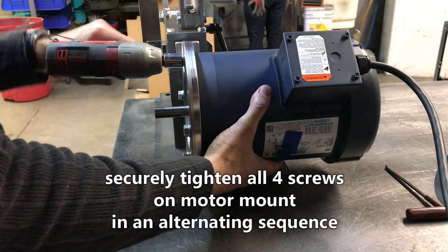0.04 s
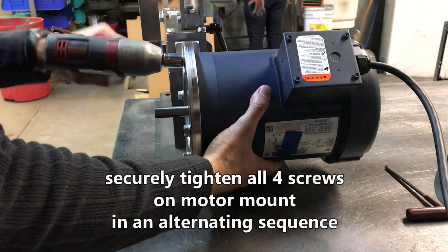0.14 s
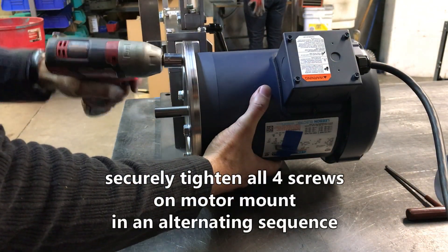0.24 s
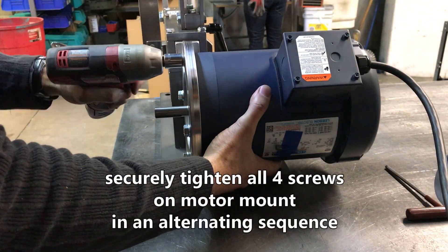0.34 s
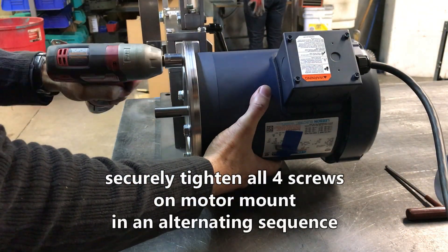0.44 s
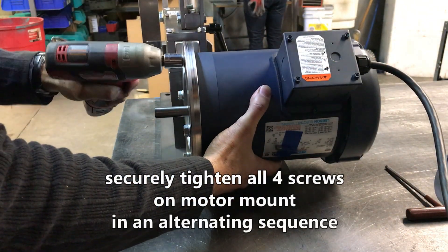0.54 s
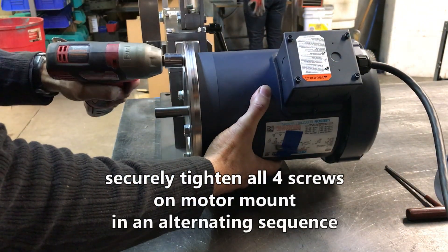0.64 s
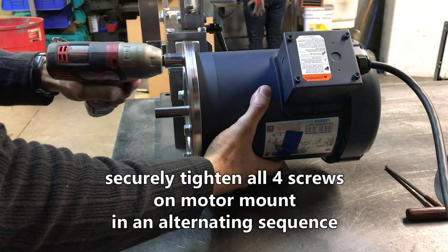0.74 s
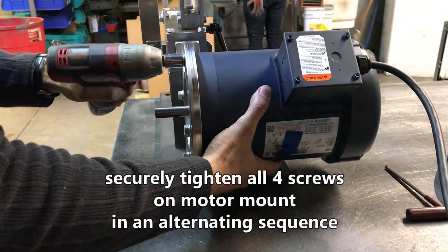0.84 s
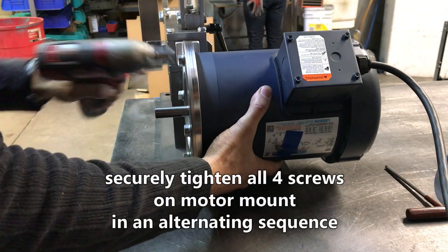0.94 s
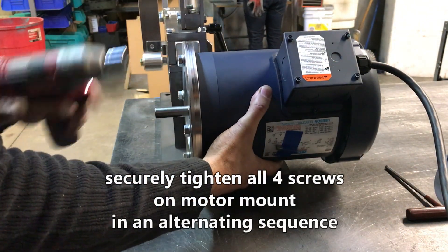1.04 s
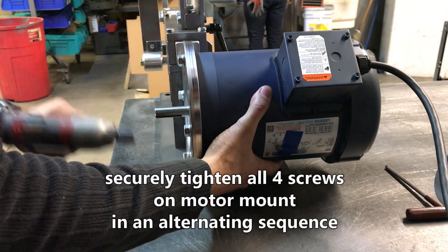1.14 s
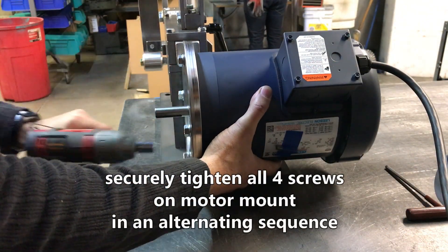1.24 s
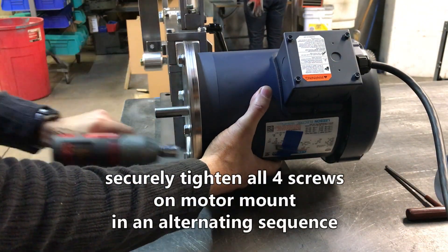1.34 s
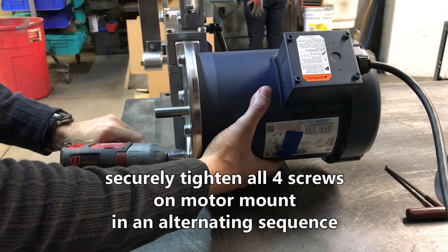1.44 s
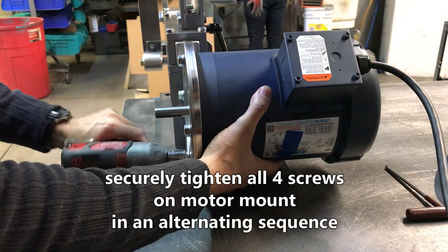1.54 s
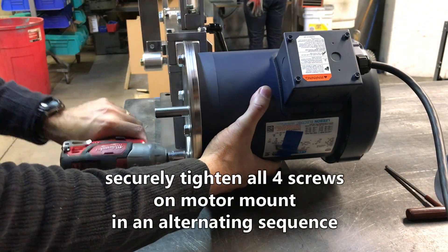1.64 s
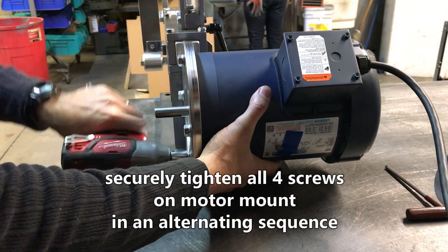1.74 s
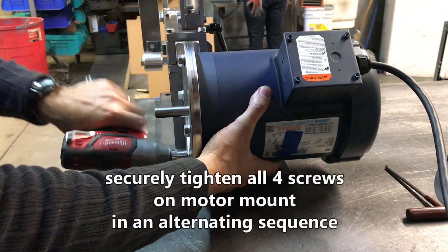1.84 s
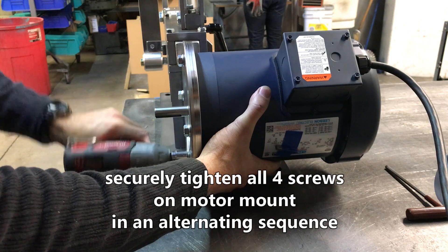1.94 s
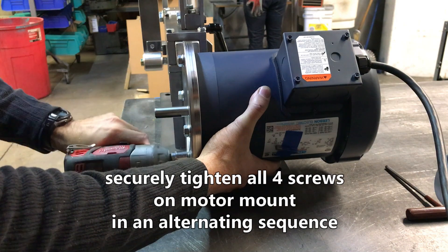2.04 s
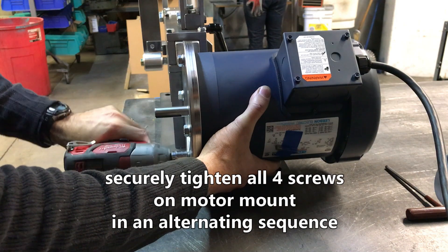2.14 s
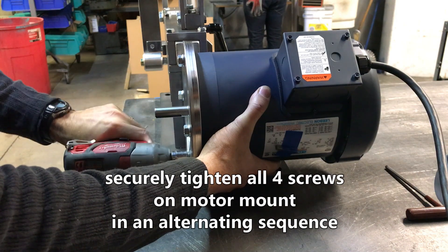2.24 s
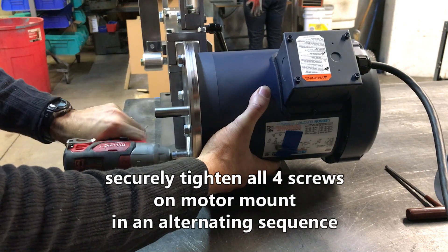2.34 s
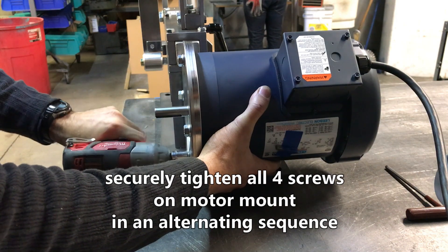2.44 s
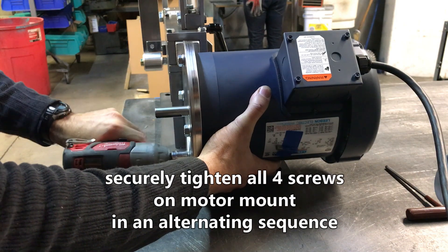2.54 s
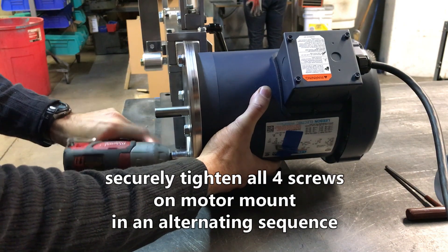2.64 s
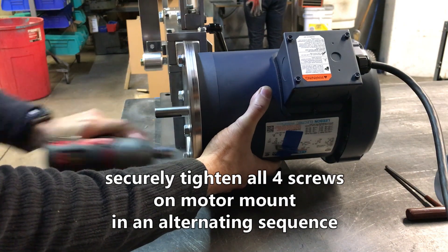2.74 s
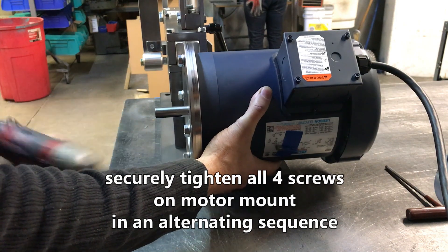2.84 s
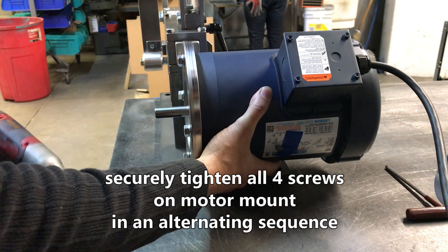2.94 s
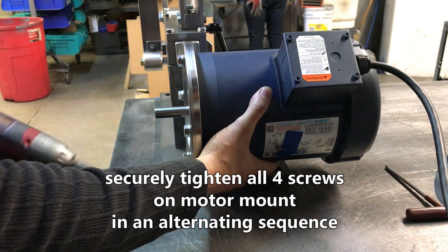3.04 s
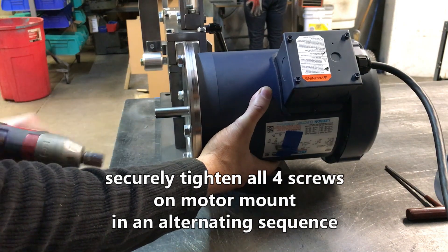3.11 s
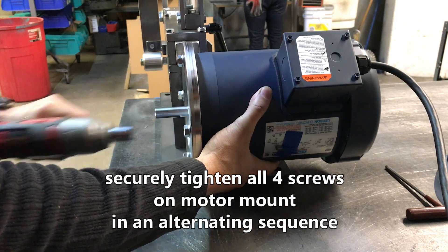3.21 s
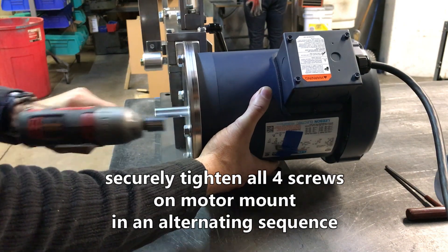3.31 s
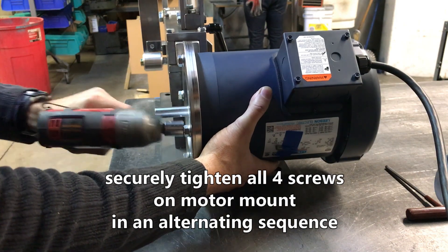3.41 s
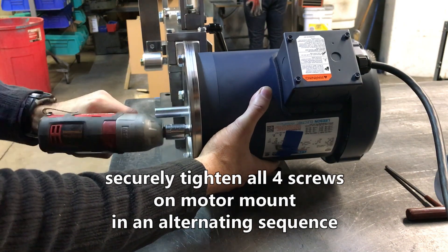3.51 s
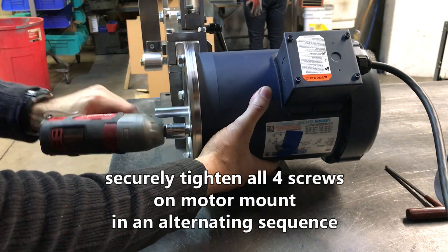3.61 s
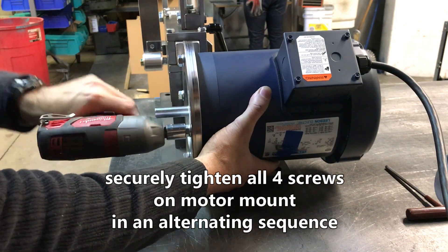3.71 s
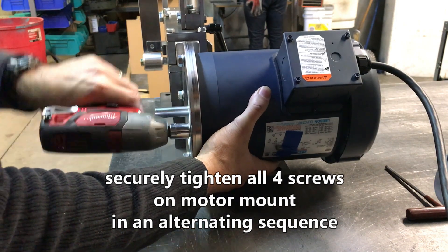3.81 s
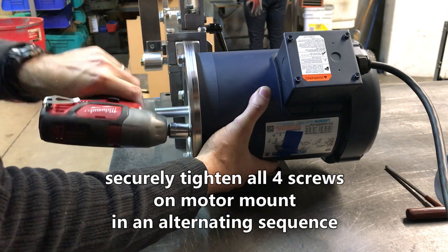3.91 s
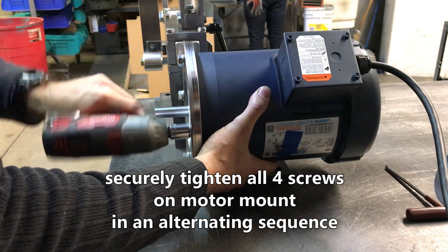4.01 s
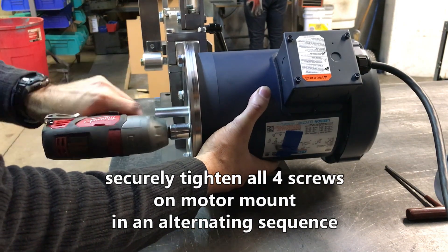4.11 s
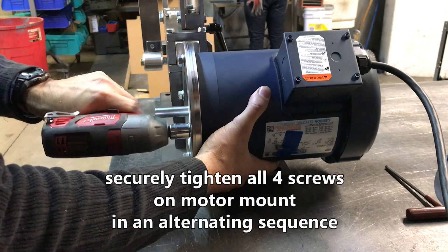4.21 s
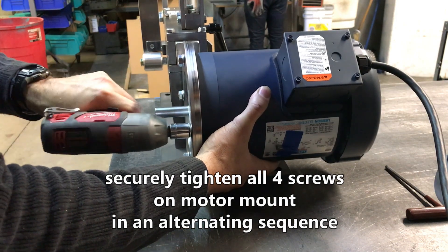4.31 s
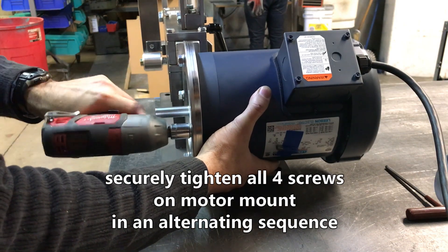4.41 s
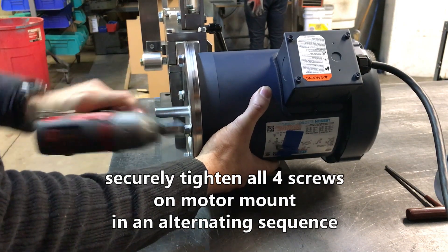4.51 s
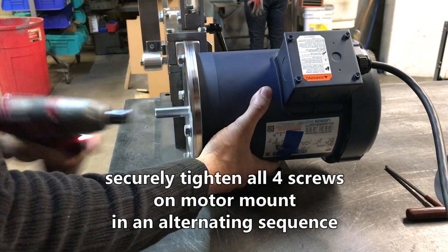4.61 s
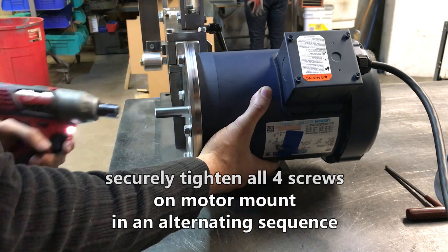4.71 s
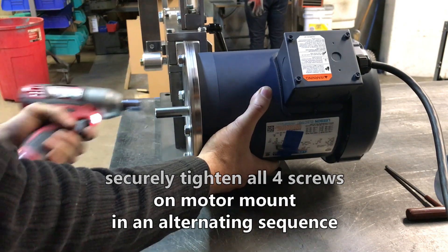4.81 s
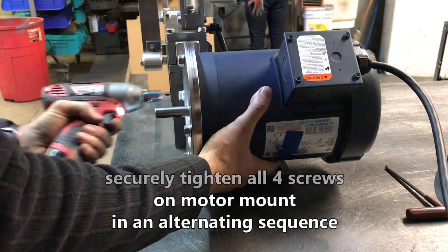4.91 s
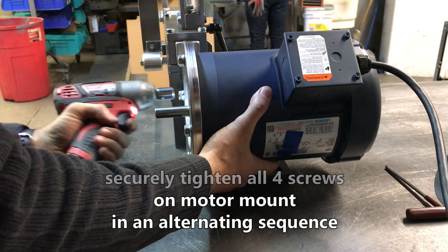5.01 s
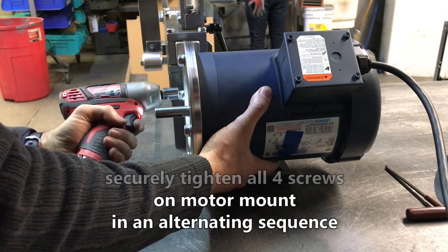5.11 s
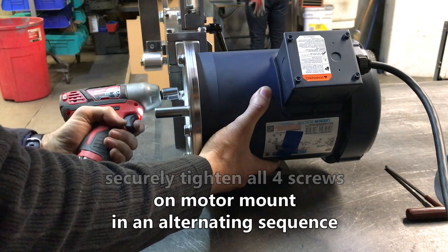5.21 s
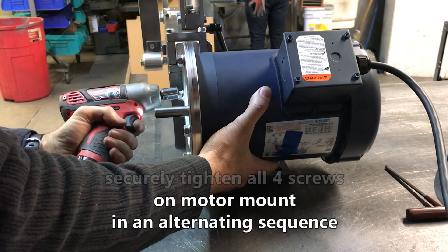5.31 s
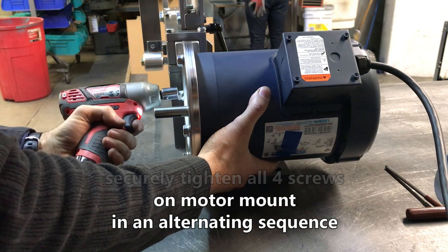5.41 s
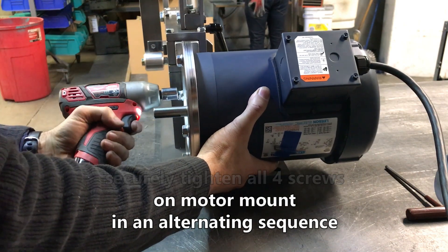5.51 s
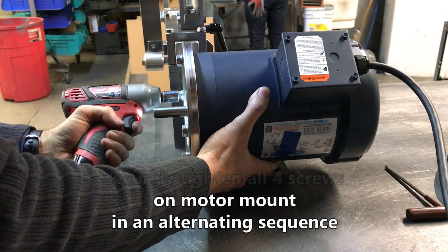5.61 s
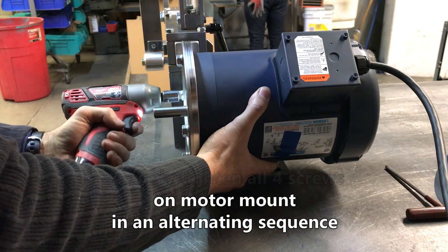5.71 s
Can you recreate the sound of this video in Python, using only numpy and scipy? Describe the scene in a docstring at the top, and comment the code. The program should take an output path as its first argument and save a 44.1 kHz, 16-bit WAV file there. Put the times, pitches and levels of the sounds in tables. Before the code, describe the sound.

A cordless impact driver rattles in three short bursts, with light metal clicks between them, over a throbbing workshop machine.

```python
"""A cordless impact driver tightens three screws on a motor's mounting plate. Each burst is a short
train of hammer blows that ring the steel and grow harder as the screw seats; a few jolt the bench.
Between bursts the bit clicks on the screw heads. Behind, a belt-driven workshop machine throbs,
later joined by a hiss of air. Gain control ducks the workshop under each burst and lets it swell back."""
import sys
import numpy as np
from scipy import signal
from scipy.fft import rfft, irfft, next_fast_len
from scipy.io import wavfile
from scipy.ndimage import uniform_filter1d, map_coordinates

SR = 44100
rng = np.random.default_rng(int(sys.argv[2]) if len(sys.argv) > 2 else 0)


def waveform_to_disk(signal):
    """Save audio, clipped to [-1, 1], as 16-bit WAV at the path in sys.argv[1]."""
    frames = np.transpose(np.atleast_2d(signal))
    scaled = np.clip(frames, -1, 1) * 32767
    samples = np.round(scaled).astype(np.int16)
    wavfile.write(sys.argv[1], SR, samples)


N = 253575

# Machine clatter. Each row: frequency in Hz, relative level in dB.
CLATTER_SPECTRUM = [(25, -21), (70, -13.5), (120, -3.5), (270, -10.5), (420, -5), (620, -6), (1050, -5),
                    (1650, -12.5), (3250, -16), (4700, -26), (6500, -27), (7900, -32), (9800, -32.5),
                    (16000, -47)]
# Machine hum. Each row: frequency in Hz, relative level in dB.
HUM_TONES = [(118.4, -57.5), (360.7, -61), (452.2, -57), (549.1, -54), (592.2, -57.5), (699.8, -52.5),
             (845.2, -59), (969.0, -57.5), (1120, -58), (1238, -60.5), (1324, -59)]
# Belt speed. Each row: time in seconds, turns per second.
BELT_SPEED = [(0, 11.37), (1.2, 11.42), (3.2, 11.33), (4.6, 11.2), (5.75, 11.33)]
# Air hiss. Each row: frequency in Hz, relative level in dB.
HISS_SPECTRUM = [(1000, -14.5), (2400, 1.5), (4000, 0), (5000, -4.5), (6300, -5), (7800, -11.5),
                 (9400, -11), (10500, -19), (13300, -17.5), (16000, -26)]
# Build-up of the hiss. Each row: time in seconds, level in dB.
HISS_ENVELOPE = [(2.5, -75), (2.8, -55), (3.3, -51), (4, -49), (5.75, -50.5)]
# Workshop echo. Each row: frequency in Hz, T60 in seconds.
ROOM_DECAY = [(200, 0.53), (4000, 0.35), (8000, 0.23), (15000, 0.133)]
# Blows that jolt the bench. Each row: start in seconds, level in dB.
BENCH_JOLTS = [(2.48, -26), (4.356, -12), (4.3768, -8), (4.4158, -5)]
# Bit meets or leaves a screw head. Each row: start in seconds, relative level in dB,
# favoured ring in Hz, treble tilt in dB per octave.
BIT_CLICKS = [(.007, -27, 3950, 2), (0.545, -29, 5760, 5), (0.552, -26, 3910, -2), (1.4274, -9.5, 6070, 1),
              (1.454, -31, 6200, -2), (1.7946, -14.5, 6900, -2.5), (1.999, -37, 5970, 2),
              (2.419, -20.5, 6050, 4.5), (3.466, -19, 5880, 1), (3.834, -14, 9600, 2.5),
              (4.258, -26.5, 4000, 5), (4.27, -22.5, 4000, -2.5), (5.109, -21, 3280, -3),
              (5.648, -31.5, 4000, -1.5)]
# Ring of the bit on a screw head. Each row: frequency in Hz, relative level in dB, T60 in seconds.
BIT_MODES = [(3200, -16, 0.061), (4178, -19, 0.068), (4460, -20.5, 0.038), (6216, 4.5, 0.045),
             (6400, -15.5, 0.17), (7260, -25, 0.06), (8730, -14.5, .1), (9700, -2, 0.042),
             (12070, -19.5, .1)]
# Scrape of a light contact. Each row: frequency in Hz, relative level in dB.
SCRAPE_SPECTRUM = [(80, -61), (500, -6), (2900, -10.5), (4100, 7), (5000, -4), (6300, -0.5), (8000, -4.5),
                   (9700, -6), (12000, -10), (16000, -16)]
# Anvil, bit and plate. Each row: frequency in Hz, bandwidth in Hz, relative level in dB.
STEEL_MODES = [(1520, 430, -14.5), (2330, 110, -20), (3255, 84, -2), (4000, 165.4, 6), (4273, 151, 1.5),
               (5750, 260, -2), (5832, 150, 1.5), (7350, 390, -3.5), (8300, 220, -0.5), (9790, 140, -3),
               (11420, 750, -7.5)]
# Broad colour of a blow. Each row: frequency in Hz, relative level in dB.
CRASH_SPECTRUM = [(60, -16), (250, -14.5), (1000, -11), (1700, -7), (4000, -1.5), (7000, 2.5), (11500, 1),
                  (16000, -6.5)]
# One pull per screw. Each row: start and stop in seconds, gear whirr in dB, favoured ring in Hz,
# relative treble tilt in dB per octave, seating time in seconds, gain once seated in dB.
TRIGGER_PULLS = [(0.595, 0.804, -38.5, 3210, -2.5, 0.725, 3.5), (2.439, 2.634, -33, 5940, 0, 2.59, 11.5),
                 (4.294, 4.452, -28.5, 2240, -2, 4.39, 5)]
# Hammering at full trigger. Each row: start in seconds, relative level before seating in dB,
# first rattle length in seconds, number of blows.
BLOW_TRAINS = [(2.4545, -10, 0.015, 9), (4.3113, -4.5, 0.019, 6)]
# Blows at half trigger or as the motor stops. Each row: start in seconds,
# relative level before seating in dB, rattle length in seconds.
SINGLE_BLOWS = [(.6105, -12.5, 0.014), (.626, -14.5, 0.0065), (.6605, -20, .014), (.6862, -7.5, 0.0053),
                (.7165, -18, 0.0033), (.728, -10, 0.011), (.741, -15, 0.0084), (.7697, -14.5, 0.0084),
                (.795, -9.5, 0.0048), (.8575, -13.5, 0.0041), (2.6405, -20, 0.0053),
                (2.6525, -18.5, 0.0034), (4.439, 0.5, 0.0019)]


def amp(db):
    """Decibels to gain."""
    return 10 ** (np.asarray(db) / 20)


def unit_rms(x):
    """Scale to rms 1."""
    return x / np.sqrt(np.mean(x ** 2) + 1e-20)


def at_hz(points, hz):
    """Interpolate (Hz, value) points on a log axis."""
    knots_hz, values = np.transpose(points)
    return np.interp(np.log(hz + 1), np.log(knots_hz), values)


def at_time(points, t):
    """Interpolate (seconds, value) points."""
    return np.interp(t, *np.transpose(points))


def wobble(rate_hz):
    """Smooth random curve, rate_hz knots per second."""
    knots = rng.standard_normal(int(N * rate_hz / SR) + 4)
    return map_coordinates(knots, [np.arange(N) * rate_hz / SR])


def filtered(x, response):
    """Apply a gain given as a function of Hz."""
    size = next_fast_len(len(x) + SR // 10)
    return irfft(rfft(x, size) * response(np.fft.rfftfreq(size, 1 / SR)), size)[:len(x)]


def noise(spectrum, size):
    """Coloured noise of rms 1."""
    return unit_rms(filtered(rng.standard_normal(size), lambda hz: amp(at_hz(spectrum, hz))))


def band_limit(hz, top_hz=15750):
    """Steep low-pass response."""
    return amp(-np.clip((hz - top_hz) / 100, 0, 11) ** 2)


def room_echo(x):
    """Workshop echo: each frequency dies at its own rate."""
    hz, t, spectra = signal.stft(rng.standard_normal(SR * 3 // 4), SR, nperseg=256)
    decay = amp(-60 * t / at_hz(ROOM_DECAY, hz)[:, None])
    tail = signal.istft(spectra * decay, SR, nperseg=256)[1]
    return signal.fftconvolve(x, np.pad(tail / np.linalg.norm(tail), (SR // 200, 0)))[:N]


def belt_machine():
    """Part of the clatter repeats every belt turn; the hum throbs with it."""
    t = np.arange(N) / SR
    turns = np.cumsum(at_time(BELT_SPEED, t)) / SR
    throb = np.cos(2 * np.pi * turns)
    cycle = rng.standard_normal(round(SR / BELT_SPEED[0][1]))
    position = (turns + 0.001086 * wobble(6.9)) % 1 * len(cycle)
    looped = unit_rms(map_coordinates(cycle, [position], mode="grid-wrap"))
    loop_share = lambda hz: at_hz([(250, 0.089), (500, 0.49), (1300, 0.6), (3500, 0.44)], hz)
    periodic = filtered(looped, lambda hz: np.sqrt(loop_share(hz)))
    irregular = filtered(rng.standard_normal(N), lambda hz: np.sqrt(1 - loop_share(hz)))
    clatter = unit_rms(filtered(periodic + irregular, lambda hz: amp(at_hz(CLATTER_SPECTRUM, hz))))
    hum = np.zeros(N)
    for hz, db in HUM_TONES:
        depth = at_hz([(120, .05), (450, 0.204), (690, 0.834), (950, 0.028)], hz)
        drift_rad = hz / 600 * wobble(5) + .3 * wobble(40)
        envelope = amp(db + 1.24 * wobble(7)) * (1 + depth * throb)
        hum += envelope * np.sin(2 * np.pi * (hz * t + rng.random()) + drift_rad)
    return amp(-45) * clatter + amp(1.14) * hum


def air_hiss():
    """A rush of air builds up, with a thin whistle at its start."""
    t = np.arange(N) / SR
    air = amp(at_time(HISS_ENVELOPE, t) + .4 * wobble(8)) * noise(HISS_SPECTRUM, N)
    whistle_hz = at_time([(2.75, 13480), (3.5, 13250)], t) + 80 * wobble(300)
    whistle_db = at_time([(2.6, -100), (2.8, -72), (3.3, -77), (3.8, -93)], t)
    return air + amp(whistle_db) * np.sin(2 * np.pi * np.cumsum(whistle_hz) / SR)


def bench_thuds():
    """Bending waves: highs arrive first, then sink to a thud. The sign alternates as the bench rocks."""
    out, t = np.zeros(N), np.arange(SR // 10) / SR
    cycles = (t / .00018) ** .26
    thud = np.sin(2 * np.pi * cycles) * np.exp(-(t / 0.0242) ** 3)
    for k, (start_s, db) in enumerate(BENCH_JOLTS):
        add(out, start_s, (-1) ** k * amp(db) * thud)
    return out


def add(track, start_s, sound):
    """Mix a sound into a track."""
    part = track[round(start_s * SR):][:len(sound)]
    part += sound[:len(part)]


def nearest_pull(time_s):
    """The trigger pull that starts nearest to time_s."""
    return min(TRIGGER_PULLS, key=lambda pull: abs(pull[0] - time_s))


def contact_gain(hz, ring_hz, tilt_db_oct, boost_db):
    """The contact point tilts the treble and favours one resonance."""
    octaves = np.log2(np.maximum(hz, 1000) / 6000)
    peak = np.exp(-(np.log((hz + 1) / ring_hz) / .05) ** 2)
    return amp(tilt_db_oct * octaves + boost_db * peak)


def light_contacts(scrape_s=0.00702, tap_s=0.0046, coast_start_s=.8712, coast_gap_s=.0106):
    """Each row: start in seconds, relative dB, ring in Hz, tilt in dB per octave, length in seconds."""
    rows = [(*click, scrape_s) for click in BIT_CLICKS]
    for start_s, _, _, ring_hz, tilt_db_oct, *_ in TRIGGER_PULLS:  # anvil takes up its slack
        rows.append((start_s, -23, ring_hz, tilt_db_oct, tap_s))
    ring_hz, tilt_db_oct = nearest_pull(coast_start_s)[3:5]
    for k in range(6):  # coasting hammer ticks over the anvil
        rows.append((coast_start_s + k * coast_gap_s, -19.5 - 1.5 * k, ring_hz, tilt_db_oct, tap_s))
    return rows


def steel_clicks():
    """Steel touches steel: a brief scrape and a thin ring."""
    out, t = np.zeros(N), np.arange(SR // 4) / SR
    attack = 1 - np.exp(-t / 0.0002)
    for start_s, db, ring_hz, tilt_db_oct, length_s in light_contacts():
        colour = lambda hz: contact_gain(hz, ring_hz, tilt_db_oct, boost_db=8.5)
        scrape = unit_rms(filtered(noise(SCRAPE_SPECTRUM, len(t)), colour))
        scrape *= np.exp(-(t / length_s) ** 2) + 0.17 * np.exp(-t / 0.021)
        ring = np.zeros(len(t))
        for hz, mode_db, t60_s in BIT_MODES:
            envelope = amp(mode_db + rng.normal(0, 1.25) - 60 * t / t60_s)
            ring += colour(hz) * envelope * np.sin(2 * np.pi * (hz * t + rng.random()))
        add(out, start_s, amp(db) * (amp(-12) * scrape + amp(-27) * ring) * attack)
    return out


def ring_steel(force, ring_db, ring_hz, tilt_db_oct):
    """Force rings the steel modes, at new strengths each time, over a broad crash. Unit power gain."""
    strengths = amp(rng.normal(0, 2, len(STEEL_MODES)))

    def response(hz):
        modes = 0
        for k, (mode_hz, width_hz, db) in enumerate(STEEL_MODES):
            resonance = 1j * hz * width_hz / (mode_hz ** 2 - hz ** 2 + 1j * hz * width_hz)
            modes += (-1) ** k * strengths[k] * amp(db) * resonance
        gain = amp(at_hz(CRASH_SPECTRUM, hz)) + 1j * amp(ring_db) * modes
        gain *= contact_gain(hz, ring_hz, tilt_db_oct, boost_db=5) * band_limit(hz)
        return gain / np.sqrt(np.mean(abs(gain) ** 2))
    return filtered(force, response)


def seating_db(time_s, seat_s, seated_db, width_s=0.013):
    """Extra level as the screw head seats and the joint stiffens."""
    return seated_db * (1 + np.tanh((time_s - seat_s) / (2 * width_s))) / 2


def gear_whirr(rise_s=0.0073, fall_s=0.017):
    """The gears chatter through the steel during each pull."""
    out, t = np.zeros(N), np.arange(SR // 3) / SR
    for start_s, stop_s, db, ring_hz, tilt_db_oct, seat_s, seated_db in TRIGGER_PULLS:
        spin = np.clip(t / rise_s, 0, 1) * np.exp(-np.maximum(start_s + t - stop_s, 0) / fall_s)
        chatter = amp(3.1 * wobble(394.5)[:len(t)] + seating_db(start_s + t, seat_s, seated_db))
        force = spin * chatter * rng.standard_normal(len(t))
        whirr = ring_steel(force, ring_db=2.36, ring_hz=ring_hz, tilt_db_oct=tilt_db_oct - 3)
        add(out, start_s, amp(db) * whirr)
    return out


def blow_schedule(beat_s=.01935, spin_up_s=.007, spin_up_blows=.8, rattle_ratio=0.87):
    """Single blows, plus trains that settle to an even beat and rattle less as the play is taken up."""
    rows = list(SINGLE_BLOWS)
    for start_s, db, rattle_s, count in BLOW_TRAINS:
        for k in range(count):
            lag_s = spin_up_s * (1 - np.exp(-k / spin_up_blows))
            rows.append((start_s + k * beat_s + lag_s, db, rattle_s * rattle_ratio ** k))
    return rows


def hammer_blows(recoil_hz=149.5, recoil_decay_s=0.0055):
    """Hammer hits anvil: a bright crack, a rattle of loose anvil and bit, a recoil of the tool's body."""
    out, t = np.zeros(N), np.arange(SR // 10) / SR
    recoil = np.sin(2 * np.pi * recoil_hz * t) * np.exp(-t / recoil_decay_s)
    for start_s, db, rattle_s in blow_schedule():
        ring_hz, tilt_db_oct, seat_s, seated_db = nearest_pull(start_s)[3:]
        envelope = np.exp(-(t / rattle_s) ** 2.6) + 0.62 * np.exp(-t / 0.0084)
        bounces = envelope * rng.standard_normal(len(t)) * amp(2.3 * wobble(626)[:len(t)])
        impact = np.exp(-t / 0.0035) * rng.standard_normal(len(t))
        rattle = ring_steel(bounces, ring_db=3.5, ring_hz=ring_hz, tilt_db_oct=tilt_db_oct - 0.38)
        crack = ring_steel(impact, ring_db=-32, ring_hz=12600, tilt_db_oct=0)
        blow = amp(-12.5) * rattle + amp(-9.5) * crack + amp(-33) * recoil
        add(out, start_s, amp(db + seating_db(start_s, seat_s, seated_db)) * blow)
    return out


def scene():
    """The tool close by, the workshop behind. Mono."""
    driver = gear_whirr() + hammer_blows()
    clicks = steel_clicks()
    echo = room_echo(amp(-15) * driver + amp(-15.5) * clicks)
    return (driver + clicks + bench_thuds() + echo + belt_machine() + air_hiss())[None]


def gain_control(x, limit_db, release_db_per_s, bass_lag_s=0.15, bass_share=0.34):
    """Gain drops at once above the limit, then climbs back; a slower stage cuts the bass deeper."""
    level_db = 10 * np.log10(abs(uniform_filter1d(x ** 2, size=260)) + 1e-12)
    climb_db = release_db_per_s * np.arange(N) / SR
    cut_db = np.maximum.accumulate(np.maximum(level_db - limit_db, 0) + climb_db) - climb_db
    step = 1 / (bass_lag_s * SR)
    bass_cut_db = bass_share * signal.lfilter([step], [1, step - 1], cut_db)
    bass = filtered(x, lambda hz: 1 / (1 + (hz / 380) ** 4))
    return (x - bass + bass * amp(-bass_cut_db)) * amp(-uniform_filter1d(cut_db, size=90))


def record(dry):
    """Gain control, soft clipping, low-pass."""
    ducked = gain_control(dry[0], limit_db=-21.7, release_db_per_s=28)
    clipped = ducked / (1 + abs(ducked / .195) ** 6) ** (1 / 6)
    return filtered(clipped, band_limit)[None]


dry = scene()
out = record(dry)
waveform_to_disk(out)
```